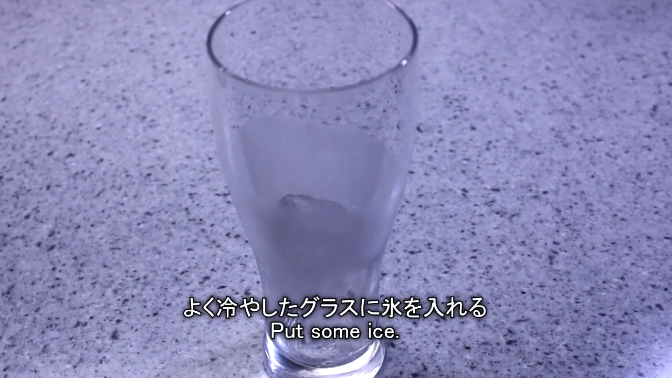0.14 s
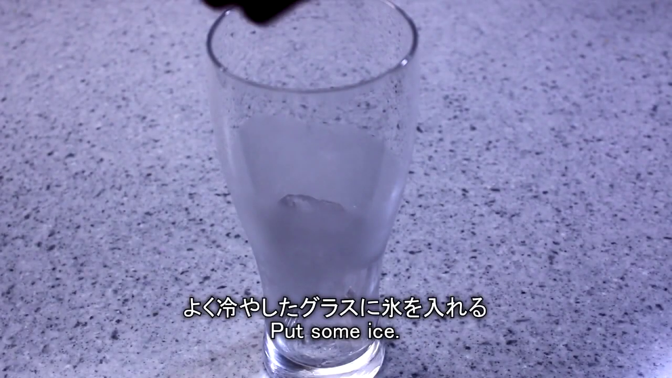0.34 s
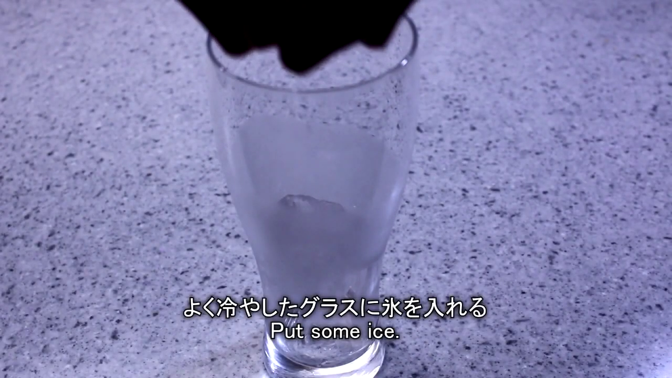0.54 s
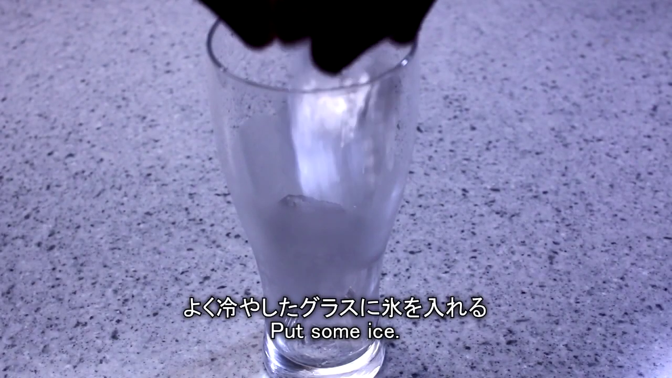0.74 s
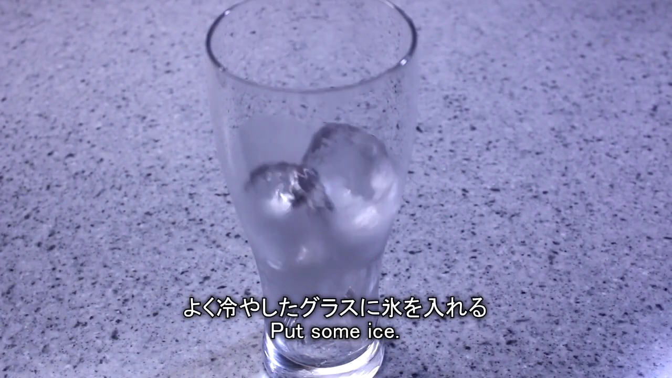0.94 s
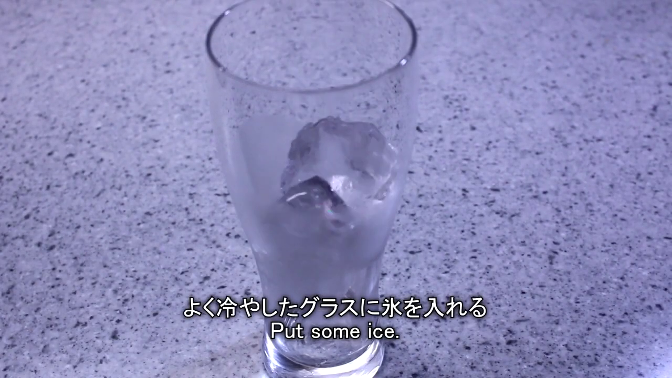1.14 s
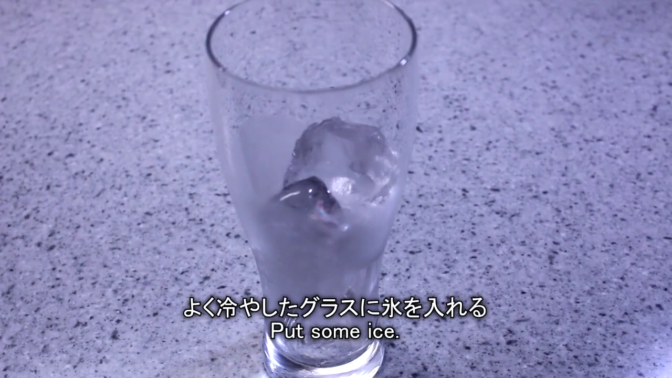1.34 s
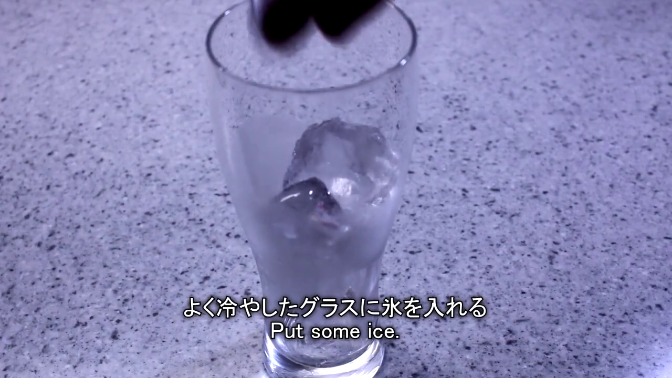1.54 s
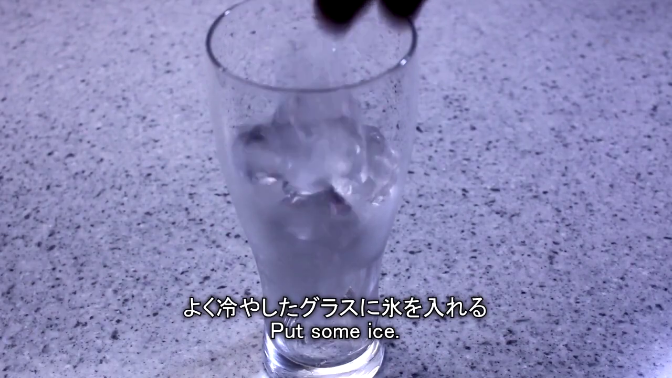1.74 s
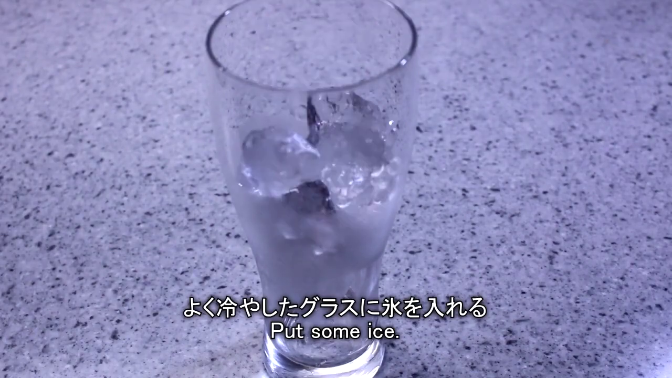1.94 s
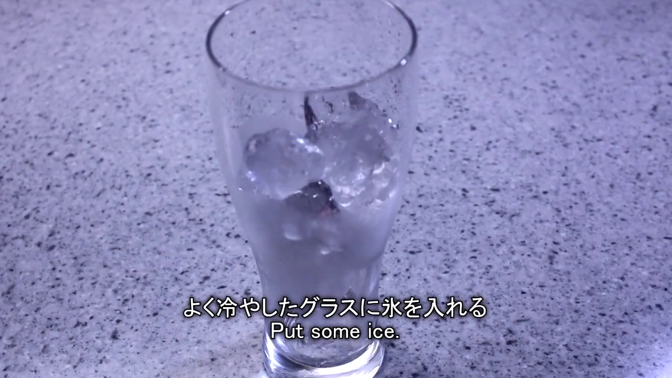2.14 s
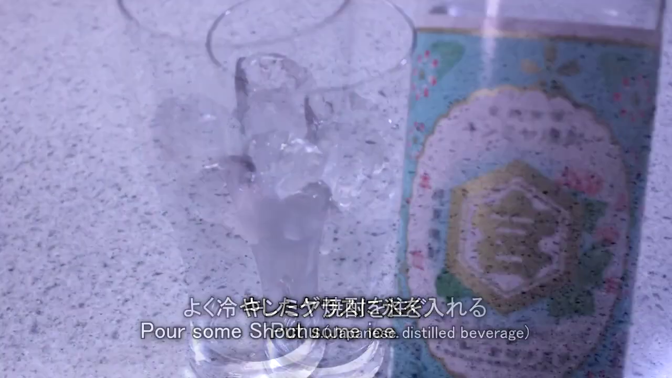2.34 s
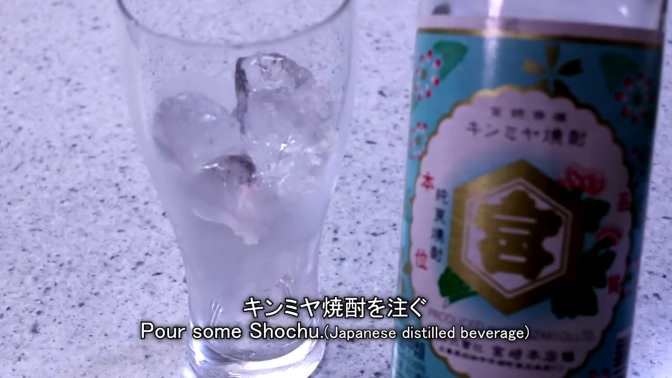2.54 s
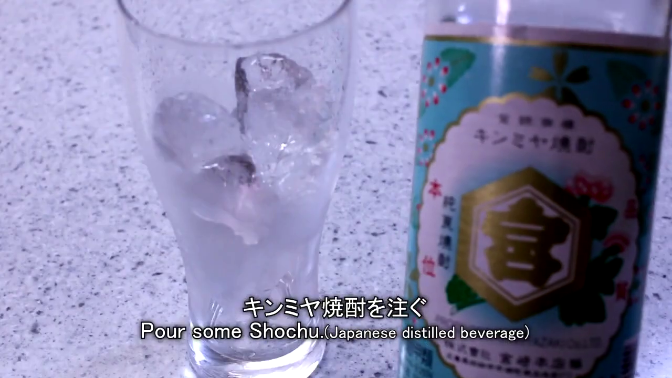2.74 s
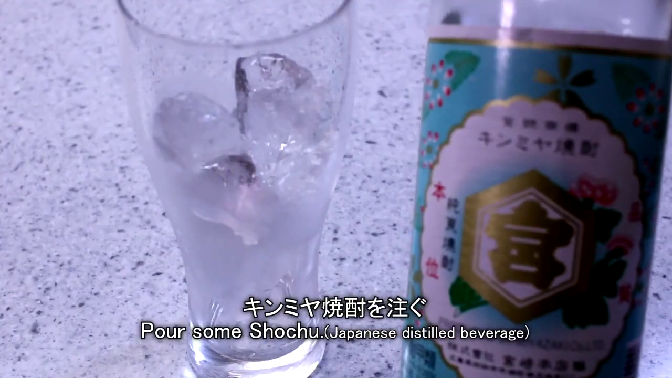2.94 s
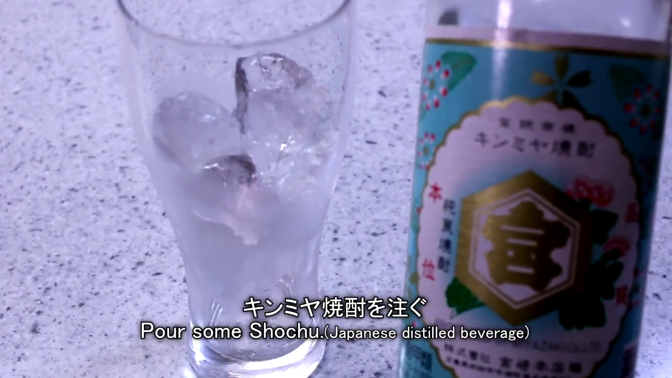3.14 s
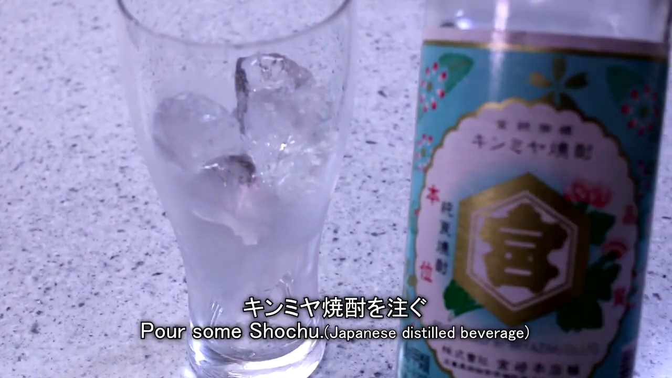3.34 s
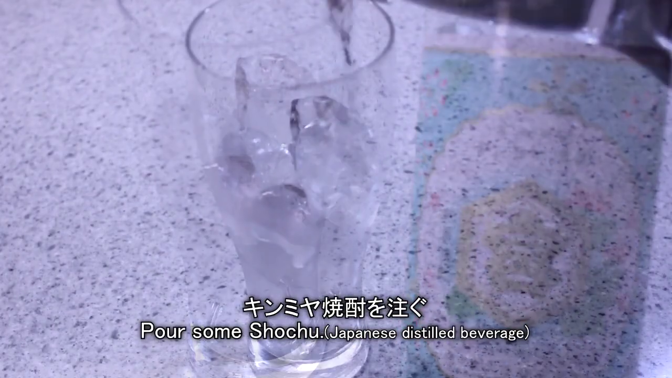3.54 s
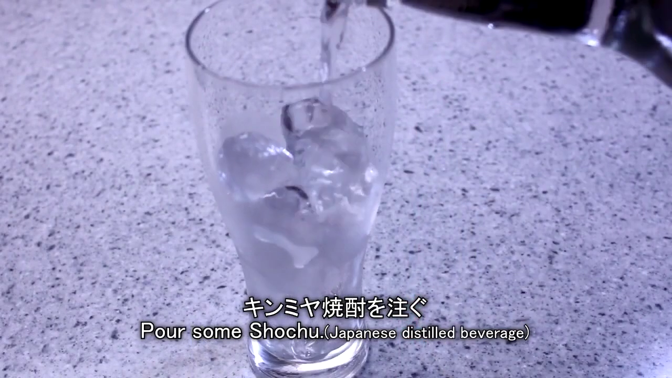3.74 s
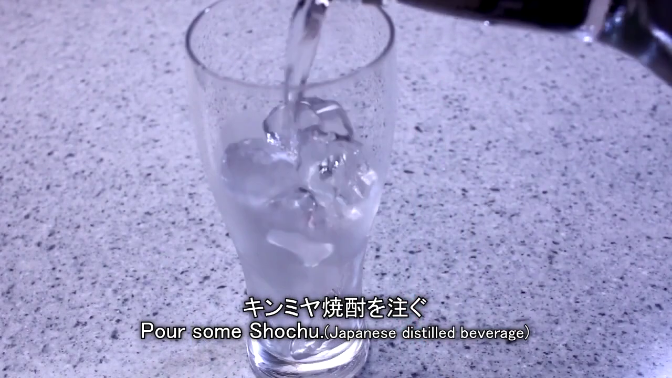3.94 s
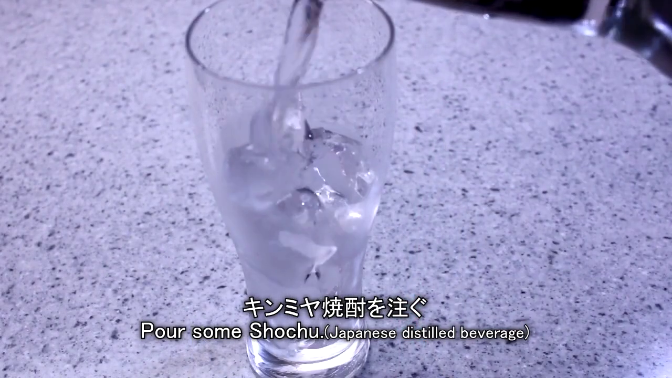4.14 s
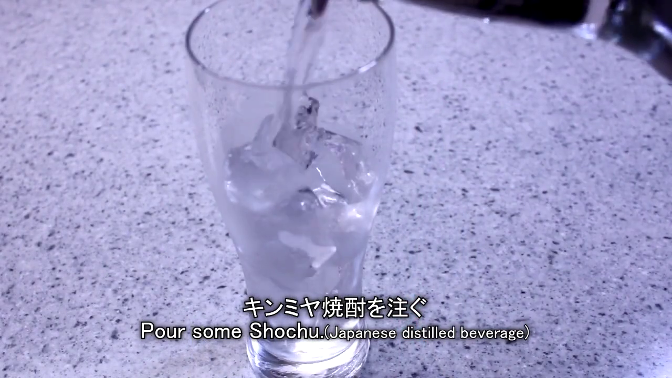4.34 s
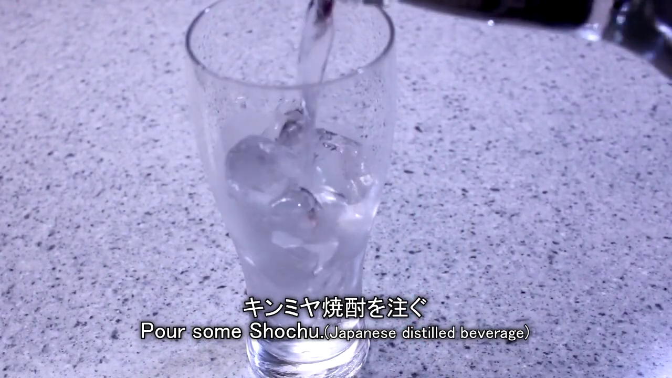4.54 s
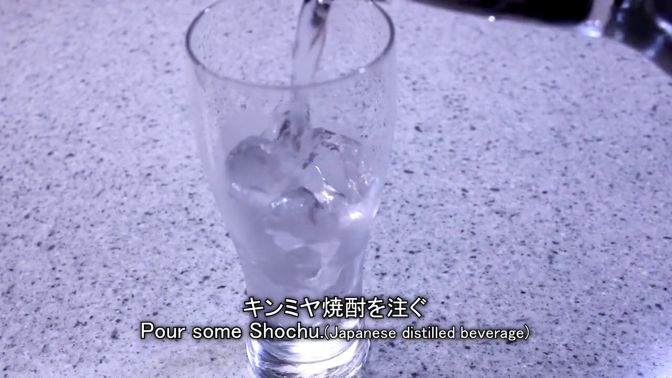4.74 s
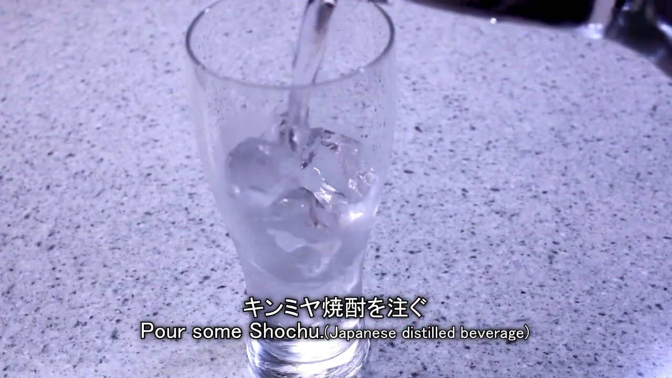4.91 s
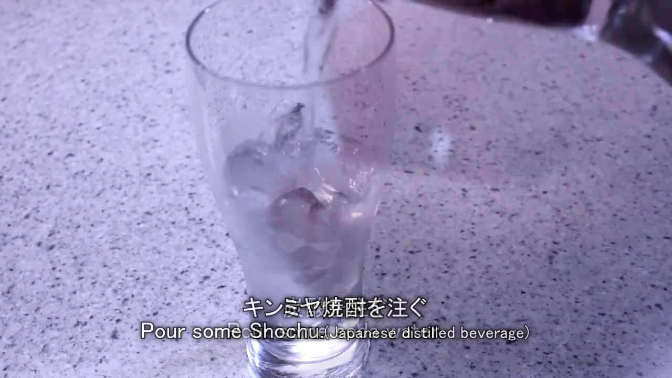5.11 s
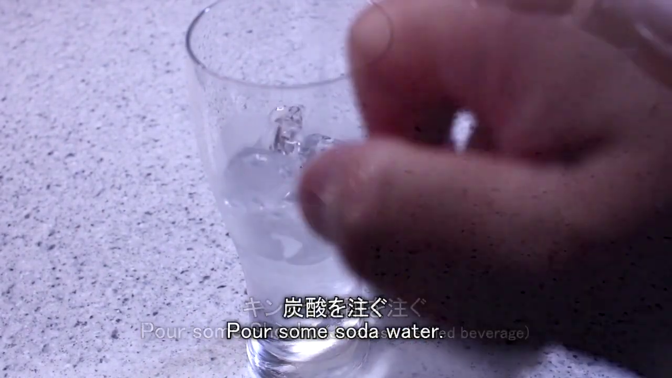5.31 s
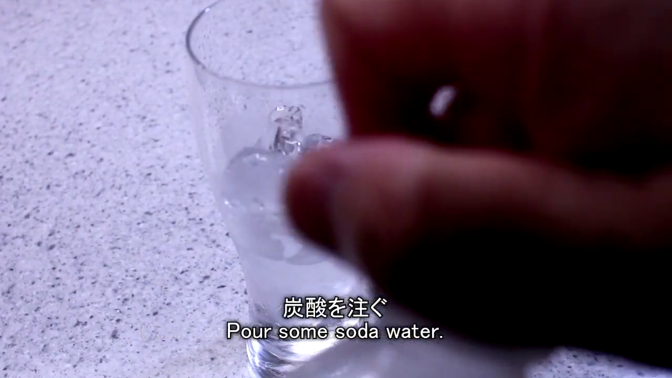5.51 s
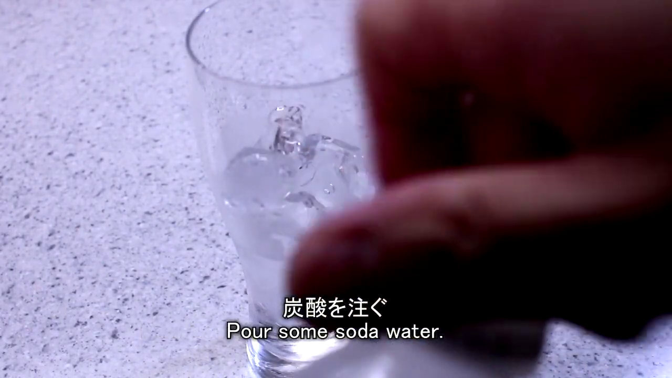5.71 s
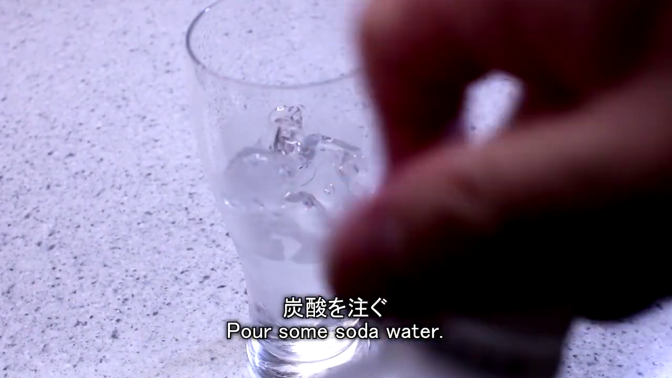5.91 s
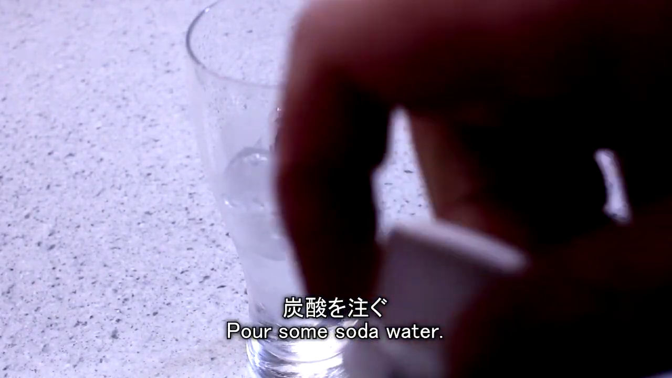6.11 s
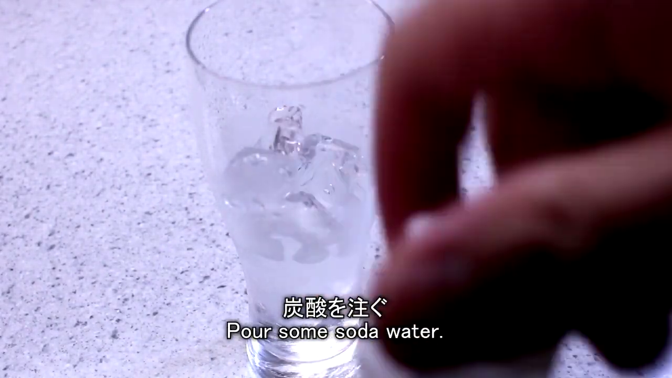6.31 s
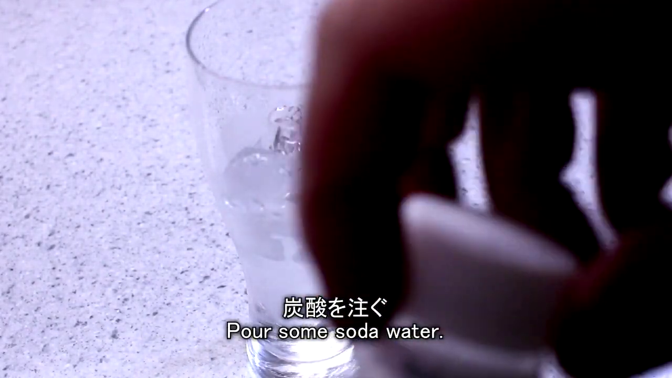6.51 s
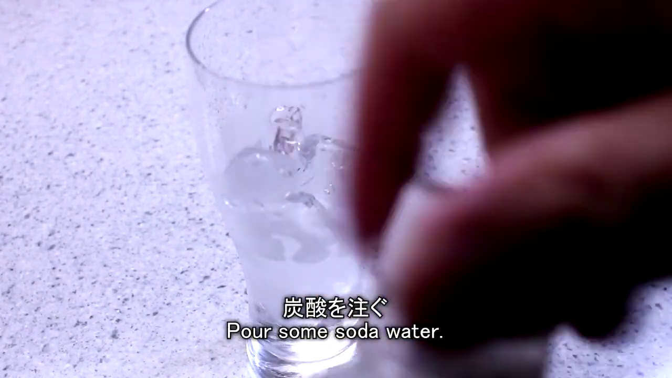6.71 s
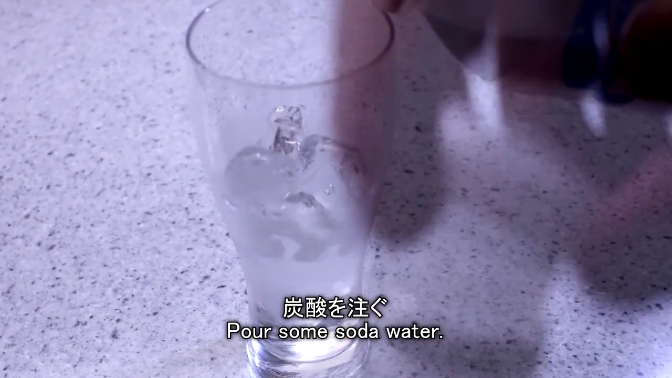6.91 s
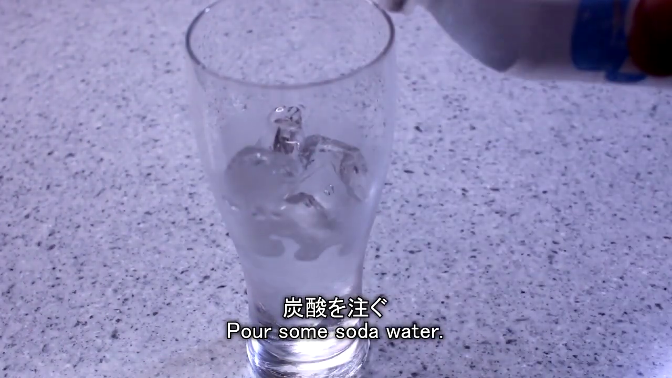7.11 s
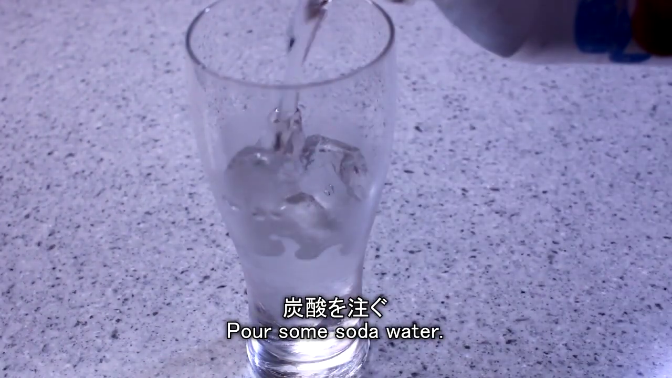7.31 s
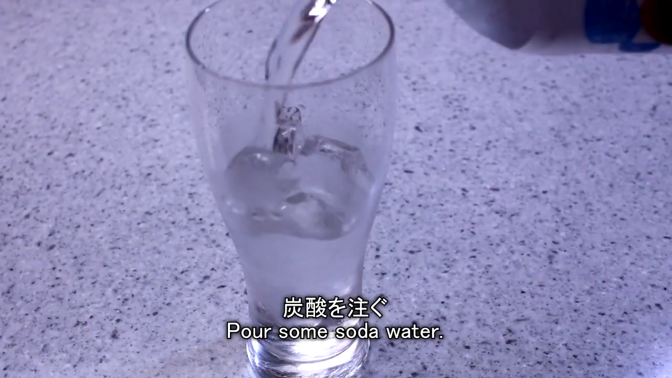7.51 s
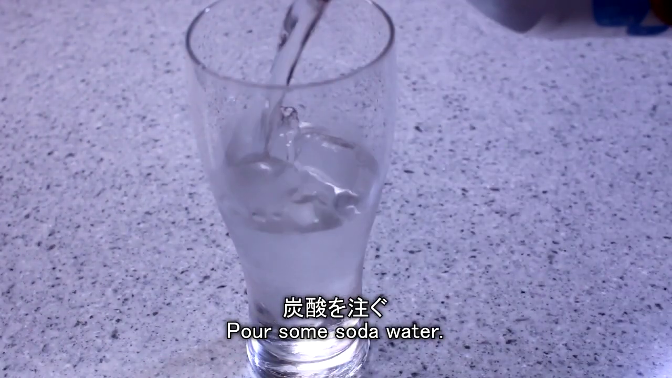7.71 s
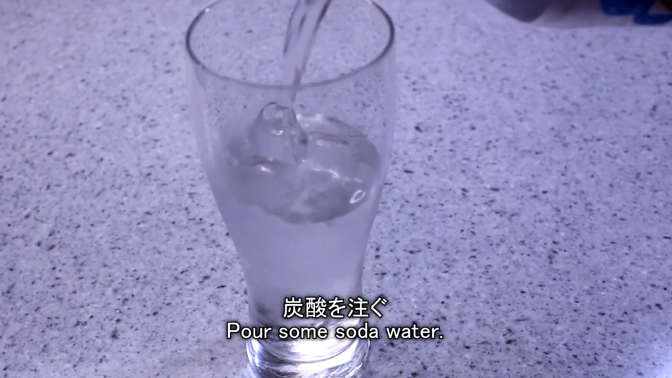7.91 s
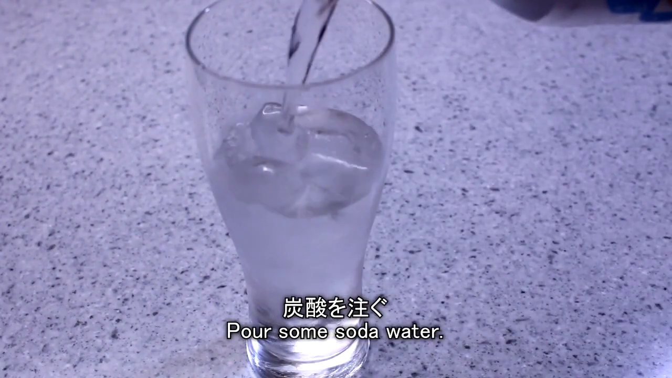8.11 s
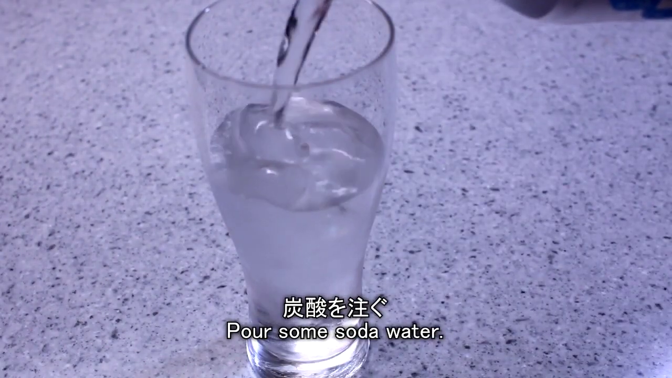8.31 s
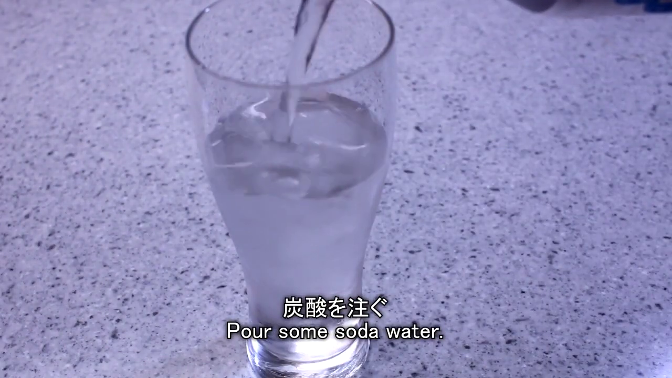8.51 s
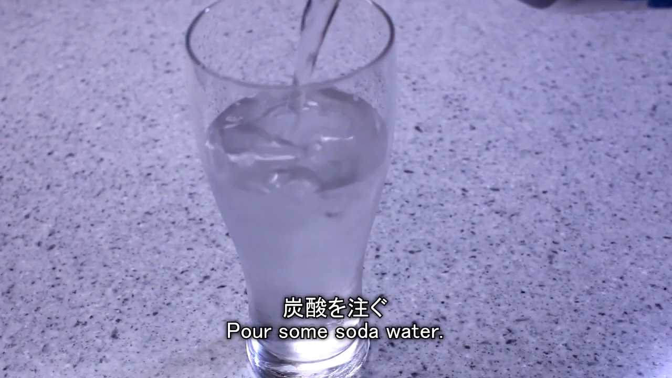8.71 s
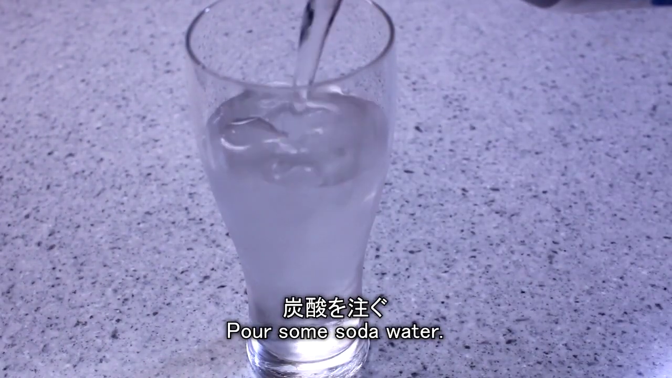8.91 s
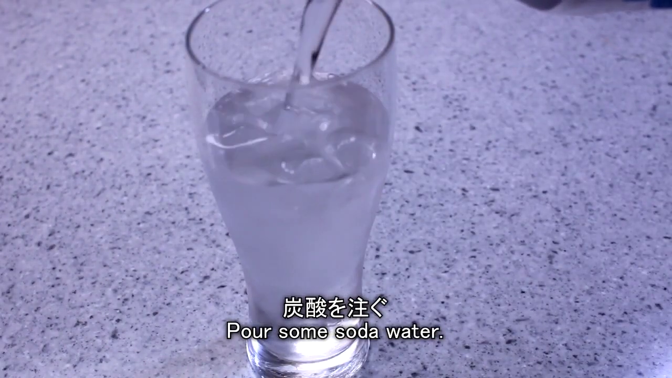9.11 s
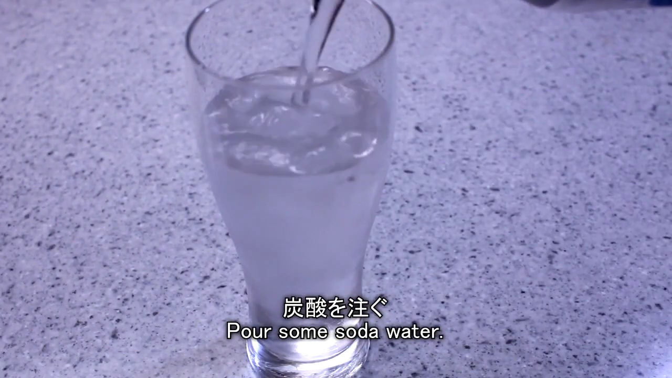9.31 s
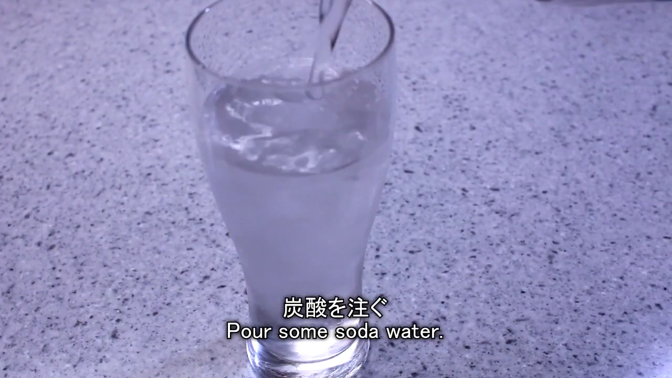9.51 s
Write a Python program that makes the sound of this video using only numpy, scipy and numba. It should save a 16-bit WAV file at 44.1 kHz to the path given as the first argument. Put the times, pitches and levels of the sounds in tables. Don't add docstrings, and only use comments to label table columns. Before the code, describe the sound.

A brief ice rattle, then hard cubes crack against glass and leave a beating ring. After a quiet gap with faint fan hum, a thin stream trickles and cubes shift and knock. A soda bottle is opened with a short burst of gas and dry plastic clicks, then soda gurgles upward to the brim. Closely miked, with slight small-room reverberation.

```python
import sys
import numpy as np
from scipy import signal
from scipy.fft import rfft, irfft, next_fast_len
from scipy.io import wavfile
from numba import njit

SR = 44100
rng = np.random.default_rng(int(sys.argv[2]) if len(sys.argv) > 2 else 0)


def attenuation_scalar(level_db):
    decades = np.asarray(level_db, float) / 20
    return 10 ** decades


def inscribe(sig):
    pcm = np.round(np.clip(np.atleast_2d(sig).T, -1, 1) * 32767)
    wavfile.write(sys.argv[1], SR, pcm.astype(np.int16))


N = 421155

# (frequency [Hz], level [dB], t60 [s])
WET_GLASS = [(345, -14.5, .12), (705, -6, 0.27), (1300, -1.5, 0.12), (2130, -24, 0.0025), (3056, 2, 0.18),
             (3780, 1, 0.054), (5450, -9, 0.12)]
# (frequency [Hz], level [dB], t60 [s])
FULL_GLASS = [(1050, -4, .07), (1280, -3, .07), (2050, -4, .05), (2800, -5, .08), (3300, 2, .06),
              (5450, -10, .04)]
# (time [s], peak [dB], ring [Hz])
FLOAT = [(7.316, -30.5, 5220), (7.378, -38, 2850), (7.405, -34.5, 2200), (7.543, -32.5, 2636),
         (7.689, -27.5, 1180), (7.833, -36, 2030), (7.9, -35, 5230), (8.0228, -32.5, 1028),
         (8.294, -24, 1140), (8.294, -24, 2100), (8.383, -21, 1290), (8.406, -16.5, 1100),
         (8.457, -20.5, 1300), (8.482, -26.5, 1040), (8.586, -32.5, 1214), (8.623, -37.5, 1000),
         (8.6582, -26, 1040), (8.66, -32.5, 1710), (8.677, -36, 1730), (8.718, -28, 1280),
         (8.753, -39.5, 1040), (8.778, -25, 1460), (8.808, -34, 1200), (8.837, -37.5, 1593),
         (8.854, -16.5, 1450), (8.858, -39, 3230), (8.874, -46, 1510), (8.884, -35, 1600),
         (8.916, -18.5, 1450), (8.968, -31, 1510), (8.978, -28.5, 1450), (9.004, -34.5, 1200),
         (9.014, -33.5, 1300), (9.048, -18, 1300), (9.057, -28, 1216), (9.08, -32.5, 1400),
         (9.102, -38.5, 1500), (9.144, -27.5, 1106), (9.169, -25.5, 1230), (9.213, -29, 1250),
         (9.23, -26, 1180), (9.281, -32.5, 1200), (9.3277, -26, 1067), (9.377, -24.5, 1100),
         (9.411, -33.5, 1032), (9.424, -33.5, 1100), (9.471, -38, 1525)]
CUBES_AFLOAT_S = 8.6
SETTLED_S, SODA_START_S = 4.567, 7.299


def rms_one(x):
    return x / np.sqrt(np.mean(x ** 2) + 1e-20)


def at_hz(points, hz):
    return np.interp(np.log(hz), np.log(np.array(points)[:, 0]), np.array(points)[:, 1])


def filtered(x, order, hz, kind):
    return signal.sosfilt(signal.butter(order, hz, kind, fs=SR, output="sos"), x)


def band(x, low_hz, high_hz):
    sos = signal.butter(2, [low_hz, min(high_hz, .45 * SR)], "band", fs=SR, output="sos")
    return signal.sosfilt(sos, x + 1e-18) * np.sqrt(SR / 2 / (high_hz - low_hz))


def colour(x, spectrum):
    gain = attenuation_scalar(at_hz(spectrum, np.linspace(1, SR / 2, 2049)))
    cepstrum = irfft(np.log(gain / np.sqrt(np.mean(gain ** 2))))
    cepstrum[1:2048] *= 2
    cepstrum[2049:] = 0
    response = irfft(np.exp(rfft(cepstrum)))
    return signal.oaconvolve(x, np.atleast_2d(response), axes=1)[:, :N]


def ring(clicks, hz, t60):
    r, w = attenuation_scalar(-60 / (t60 * SR)), 2 * np.pi * hz / SR
    return signal.lfilter([0, np.sin(w)], [1, -2 * r * np.cos(w), r * r], clicks + 1e-18)


def die_away(hits, t60):
    return signal.lfilter([1], [1, -attenuation_scalar(-60 / (t60 * SR))], hits)


@njit
def moving_resonance(x, hz, r, sr):
    y = np.zeros(len(x))
    for i in range(2, len(x)):
        turn = 2 * r * np.cos(2 * np.pi * hz[i] / sr)
        y[i] = x[i] - x[i - 2] + turn * y[i - 1] - r * r * y[i - 2]
    return y


def grains(per_s, spread_db):
    sizes = attenuation_scalar(spread_db * np.minimum(rng.exponential(1, N), 4)) * rng.choice([-1, 1], N)
    return rms_one(sizes * (rng.random(N) < per_s / SR))


def swells(s, peak_db, rise_db_s, fall_db_s):
    late = np.arange(N) / SR - np.reshape(s, (-1, 1))
    slope = np.where(late < 0, rise_db_s, -np.reshape(fall_db_s, (-1, 1)))
    return attenuation_scalar(np.maximum(np.reshape(peak_db, (-1, 1)) + slope * late, -200))


def knocks(rows, body, t60, ring_db, cycles, rise, wide_db, body_db, attack_s, linger_s=0.049, puff_db=-10.5):
    parts, rings = np.zeros((3, N + SR)), np.zeros(N + SR)
    t = np.arange(round(.15 * SR)) / SR
    noise = rng.standard_normal((len(rows), len(t)))
    stretch = np.array([[1.8], [1], [.6]])
    for (s, peak_db, hz, dull_db, bright_db), puff in zip(rows, noise):
        span = slice(round(s * SR), round(s * SR) + len(t))
        decays = attenuation_scalar(peak_db - 60 * t / stretch / t60) * (1 - np.exp(-t / attack_s))
        parts[:, span] += attenuation_scalar(np.array([[dull_db], [0], [bright_db]])) * decays
        phase = 2 * np.pi * hz * (t + rise * hz * t ** 2 / cycles)
        fade = attenuation_scalar(peak_db + ring_db - 60 * t / (cycles / hz + linger_s))
        tone = np.sin(phase) * fade * (1 - np.exp(-t * hz / 1.3))
        rings[span] += tone + attenuation_scalar(puff_db) * band(decays[1] * puff, hz / 1.296, hz * 1.31)
    dull, snap, bright = parts[:, :N] * rng.standard_normal((3, N)) * attenuation_scalar(-19.0)
    modes = np.zeros(N)
    for hz, level_db, ring_s in body:
        for detune in (.97, 1.03):
            modes += attenuation_scalar(level_db) * ring(snap, hz * detune, min(ring_s, .012 + 25 / hz))
    modes = filtered(modes, 2, 150, "high")
    snaps = band(dull, 120, 630) + attenuation_scalar(wide_db) * band(snap, 1000, 2400) + band(bright, 5700, 11000)
    return snaps + attenuation_scalar(body_db) * modes + rings[:N]


def grinding(strokes, body, per_s, rise_db_s):
    s, db, fade = np.transpose(strokes)
    slips = grains(per_s, spread_db=6.5)
    driven = swells(s, db, rise_db_s, fade).sum(axis=0) * slips
    out = np.zeros(N)
    for k, (hz, level_db, t60) in enumerate(body):
        out += attenuation_scalar(level_db) * np.sqrt(28 / (t60 * SR)) * ring(np.roll(driven, k % 3), hz, t60)
    return out


def widen(x, side_db, lag_s):
    echo = np.roll(filtered(x, 2, 7000, "low"), round(lag_s * SR))
    return x + attenuation_scalar(side_db) * echo * [[1], [-1]]


def air():
    # (frequency [Hz], density [dB per Hz])
    air_tone = [(15, -33.5), (25, 0), (64, 8), (141, -8.5), (223, 1.5), (277, -10.5), (317, -4.5),
                (516, -12), (607, -13.5), (1020, -17), (2990, -28.5), (10100, -36.5), (16000, -43)]
    # (frequency [Hz], likeness [0-1])
    likeness = [(60, 0.18), (240, 1), (950, 0.076), (3770, 0.04), (15000, 0.03)]
    # (level [dB], rise in the louder stretches [dB])
    air_parts = [
        (-77.5, 12.5),
        (-57, 4.5),
        (-56, 2),
    ]
    # (start [s], end [s])
    louder_spans = [
        (2.2, 3.69),
        (6.7, 12),
    ]
    ramp_s = 0.21
    mid, side = rfft(rng.standard_normal((2, N)))
    hz = np.linspace(1, SR / 2, len(mid))
    alike = np.clip(at_hz(likeness, hz), 0, 1)
    both = np.sqrt(1 + alike) * mid + np.sqrt(1 - alike) * side * [[1], [-1]]
    both = both * attenuation_scalar(at_hz(air_tone, hz))
    low, high = 1 / (1 + (hz / 110) ** 4), 1 / (1 + (1000 / hz) ** 2)
    shares = [low, 1 - low - high, high]
    t = np.arange(N) / SR
    lift = sum(np.clip(np.minimum(t - on, off - t) / ramp_s, 0, 1) for on, off in louder_spans)
    out = np.zeros((2, N))
    for (db, rise_db), share in zip(air_parts, shares):
        out += attenuation_scalar(db + rise_db * lift) * rms_one(irfft(both * share, N))
    return out


def ice_tray():
    # (time [s], peak [dB], ring [Hz])
    grab = [
        (0.028, -24.5, 4100),
        (0.029, -22, 2250),
        (0.039, -21, 1450),
        (0.056, -24, 2300),
        (0.076, -28, 4460),
        (0.094, -19.5, 4120),
        (0.13, -24, 6800),
        (0.15, -14, 4100),
        (0.188, -22.5, 3860),
    ]
    # (frequency [Hz], level [dB], t60 [s])
    tray = [(1100, -27, 0.09), (1450, -29, 0.013), (2500, 6.5, 0.035), (3900, 5.5, 0.047),
            (4570, -30, 0.038), (7000, -4, 0.032)]
    # (time [s], level [dB], fade [dB per s])
    rattle = [
        (.04, -36, 158),
        (.07, -61, 219),
        (.1, -51, 152),
        (.155, -48.5, 201.5),
        (.19, -55, 149),
    ]
    # (frequency [Hz], level [dB], t60 [s])
    rattle_body = [(1080, -8, .02), (1480, -5, .02), (2250, 2, .025), (2500, -4, .015), (4100, -4, .015),
                   (4550, -5, .012), (5000, -12, .01), (7300, -7, .008)]
    rows = [(*row, -24, -30) for row in grab]
    out = knocks(rows, tray, t60=0.061, ring_db=4, cycles=18.0, rise=.01, wide_db=-21, body_db=-18,
                 attack_s=.0004, linger_s=0.0091, puff_db=-14.0)
    out += grinding(rattle, rattle_body, per_s=5000, rise_db_s=2500)
    out = filtered(out, 4, 750, "high")
    return np.array([out, np.roll(out, 9)])


def rubbing():
    # (time [s], level [dB], bright grains [dB], fade [dB per s])
    rub = [
        (0.042, -37, -21.5, 94),
        (5.6, -52, 0.5, 287.5),
        (5.745, -39.5, 0, 900),
        (5.809, -48, 0.5, 694),
        (6.38, -50, 5, 95),
        (6.45, -42, -33, 348.5),
        (6.6, -68, 10.5, 41),
        (6.819, -43, -3.5, 401.5),
        (6.939, -64, 7, 394),
    ]
    s, db, bright_db, fade = np.transpose(rub)
    strokes = swells(s, db, 901, fade)
    clicks = grains(4900, spread_db=1.5)
    dull = band(strokes.sum(axis=0) * clicks, 700, 4400)
    return dull + band(attenuation_scalar(bright_db) @ strokes * clicks, 3200, 12000)


def drops():
    # (time [s], peak [dB], wall modes [dB], chatter [dB])
    landings = [(0.734, -10, -16, -19.5), (.778, -19, -5, -14), (.785, -5.5, -9.5, -24),
                (0.8141, -15, -15.5, -16), (0.846, -22.5, -2.5, -6), (1.032, -42, -11, -8),
                (1.101, -39.5, -37, -35), (1.444, -47, -8.5, -20), (1.7078, -23.5, -5, -10),
                (1.7335, -8, -8.5, -24.5), (1.746, -18.5, -6, -20.5), (1.865, -16, -16, -19),
                (1.953, -22.5, -35.5, -18.5), (1.969, -20, -18, -30), (2.429, -43, -43.5, -33.5)]
    # (frequency [Hz], density [dB per Hz])
    crack_tone = [(59, -38), (100, -19), (1230, 3), (2470, -8), (3320, -2), (4870, -11), (5530, 0),
                  (10000, -21.5), (12400, -8.5), (16000, -30)]
    wall_hz = [3200, 3380, 4030, 4640, 5470, 5620, 6220, 7430, 7960, 9100, 10740, 12120, 13260, 15400]
    # (level [dB], t60 [s])
    wall = [(-11, 0.1), (-16.5, 0.056), (-18, 0.066), (-16, 0.093), (-20, 0.12), (2.5, 0.034),
            (-1.5, 0.023), (-7.5, 0.14), (-13.5, 0.12), (-12, 0.11), (-14, 0.052), (-16.5, 0.21),
            (-27, 0.09), (-23.5, 0.09)]
    # (frequency [Hz], level [dB], t60 [s])
    base = [(163.9, -14, 0.052), (223, -13.5, 0.069), (320, -10, .07), (344, -10, 0.07), (383.5, -5, 0.06),
            (640, -3, 0.05), (720, -2, 0.06), (1202, -12, 0.04)]
    size = N // 3
    s, peak_db, wall_db, chatter_db = np.transpose(landings)
    base_db = -13 - .15 * (peak_db + 10.0)
    at = np.round(s * SR).astype(int)
    hits, rolls = np.zeros((2, 2, size))
    hits[:, at] = attenuation_scalar(peak_db + np.array([[.5], [-.5]]))
    rolls[:, at] = hits[:, at] * attenuation_scalar(chatter_db)
    mid, other = rng.standard_normal((2, size))
    noise = mid + .4 * other * [[1], [-1]]
    crack = die_away(hits, 0.026) * noise
    chatter = die_away(rolls, .3) * noise
    hard_hits = hits * attenuation_scalar(-.4 * np.abs(20 * np.log10(hits + 1e-9) + 5.5))
    keen = die_away(hard_hits, 0.012) * noise
    crack = filtered(crack, 4, 8800, "low") + attenuation_scalar(3.5) * filtered(keen, 4, 8800, "high")
    out = colour(attenuation_scalar(3.0) * crack + filtered(chatter, 4, 8800, "low"), crack_tone)[:, :size]
    split = rng.uniform(.006, .024, (len(wall), 2)) * [-1, 1]
    split = split * np.minimum(1, 8000 / np.array(wall_hz)[:, None])
    modes = []
    for hz, mode, pair in zip(wall_hz, wall, split):
        modes += [(hz * (1 + d), *mode, wall_db) for d in (0, *pair)]
    modes += [(*mode, base_db) for mode in base]
    chance = rng.standard_normal((len(at), 110))
    for k, (hz, level_db, t60, share_db) in enumerate(modes):
        sides_db = np.outer([1, -1], 1.53 * chance[:, k + 55])
        clicks = attenuation_scalar(-22.5) * chatter
        clicks[:, at] += hits[:, at] * attenuation_scalar(share_db + 2.4 * chance[:, k] + sides_db)
        out += attenuation_scalar(level_db) * ring(clicks, hz, t60)
    return np.pad(filtered(out, 2, 110, "high"), ((0, 0), (0, N - size)))


def wall_pair(rows, hz, beat_hz, t60, spread):
    t, (s, level_db, balance) = np.arange(N) / SR, np.transpose(rows)
    row = np.maximum(np.searchsorted(s, t) - 1, 0)
    age = t - s[row]
    beat = 1 + balance[row] * np.exp(2j * np.pi * beat_hz * age)
    pair = (age > 0) * attenuation_scalar(level_db[row] - 60 * age / t60) * beat
    r = np.exp(-1 / (.003 * SR))
    phase = 2 * np.pi * hz * t + np.array([[-spread], [spread]])
    return np.imag(signal.lfilter([1 - r], [1, -r], pair) * np.exp(1j * phase))


def long_modes():
    # (time [s], level [dB], pair balance [-1 to 1])
    rim_hits = [
        (.738, -14, .1),
        (.776, -34, .1),
        (.814, -11, .1),
        (.85, -23, .35),
        (1.708, -34, .5),
        (1.75, -21, -.85),
        (1.887, -55, .1),
        (1.905, -28, .2),
        (1.96, -35, -.1),
    ]
    # (time [s], level [dB], pair balance [-1 to 1])
    second_hits = [
        (.733, -23, .3),
        (.778, -32, .1),
        (.812, -11.5, -.97),
        (1.036, -39, .1),
        (1.185, -75, .1),
        (1.733, -36, .6),
        (1.8, -31, .1),
        (1.9, -31, -.3),
    ]
    lean = .6
    rim = wall_pair(rim_hits, 1439, beat_hz=4.0, t60=.46, spread=-lean)
    second = wall_pair(second_hits, 2947, beat_hz=4.7, t60=.47, spread=lean)
    return attenuation_scalar(np.array([[2.5], [4.5]])) * rim + attenuation_scalar(4.5) * second


def clacks():
    # (time [s], peak [dB], ring [Hz])
    contacts = [(0.735, -17, 4300), (0.785, -3, 6040), (.786, -12, 1230), (.814, -12.5, 2160),
                (0.817, -17, 7500), (.846, -14.5, 5530), (1.7335, -8, 6125), (1.734, -8, 7750),
                (1.733, -9, 3400), (1.736, -12, 800), (1.747, 1, 5630), (1.866, -10.5, 5500),
                (1.97, -15, 3750)]
    # (time [s], level [dB], ring [Hz])
    favoured = [
        (.786, -37.5, 11330),
        (.815, -28, 11650),
        (.815, -41, 13300),
        (1.709, -37, 5545),
        (1.745, -26, 5430),
        (1.747, -35.5, 10740),
        (1.864, -29.5, 5810),
    ]
    short = [(*row, -30, -30) for row in contacts]
    pings = [(*row, -30, -30) for row in favoured]
    out = knocks(short, [], t60=0.043, ring_db=-2, cycles=26.5, rise=0, wide_db=-27.5, body_db=-60,
                 attack_s=0.00045, linger_s=0.034)
    return out + knocks(pings, [], t60=.03, ring_db=9, cycles=30.0, rise=0, wide_db=-30.5, body_db=-60,
                        attack_s=.0005, linger_s=.13)


def grinding_cubes():
    # (time [s], level [dB], fade [dB per s])
    slides = [(.99, -40.5, 105.5), (1.1, -48.5, 297.5), (3.765, -36.5, 250), (3.79, -53, 350),
              (3.86, -39, 202), (3.9, -52, 304), (3.94, -60, 357), (4.09, -40, 203), (4.14, -36.5, 350),
              (4.18, -62, 500), (4.36, -48, 400), (4.465, -42, 300), (4.535, -50, 203), (4.57, -56, 700),
              (4.8, -62, 83), (5.0, -64, 123), (5.27, -55.5, 122)]
    # (frequency [Hz], level [dB], t60 [s])
    slide_body = [(165, -7, .07), (320, 0, .07), (400, -4, .05), (630, -3, .06), (800, -10, .04),
                  (1250, -8, .025), (1480, -12, .03), (2050, -14, .02), (2980, -13, .025),
                  (3800, -20, .015)]
    return grinding(slides, slide_body, per_s=380, rise_db_s=1205)


def settling():
    # (time [s], peak [dB], ring [Hz])
    settle = [
        (2.368, -46, 4400),
        (2.4324, -36, 4000),
        (2.4514, -41, 1770),
        (3.3864, -42, 5560),
        (3.4694, -48, 1580),
    ]
    # (time [s], peak [dB], ring [Hz])
    trickle = [(4.593, -37, 2400), (4.614, -29.5, 3950), (4.641, -31, 4500), (4.685, -34.5, 610),
               (4.72, -36.5, 1420), (4.772, -44, 885), (4.789, -35.5, 5300), (4.797, -38, 880),
               (4.813, -38, 910), (4.854, -37, 1560), (4.866, -30.5, 3850), (4.875, -41, 1120),
               (4.901, -31.5, 1563), (4.97, -44, 4200), (4.99, -24.5, 4520), (5.005, -36.5, 1520),
               (5.026, -29, 5500), (5.046, -34, 5860), (5.093, -30.5, 642), (5.115, -37, 620),
               (5.149, -35.5, 1650), (5.163, -37.5, 880), (5.176, -33.5, 2590), (5.225, -36.5, 1560),
               (5.26, -37.5, 2340), (5.283, -41, 3880), (5.323, -31, 2800), (5.338, -32, 3700)]
    rows = [(*row, -25, 6) for row in list(trickle) + list(settle)]
    return knocks(rows, WET_GLASS, t60=0.034, ring_db=0.0, cycles=14.0, rise=.008, wide_db=8, body_db=-16,
                  attack_s=0.0012, linger_s=0.015, puff_db=-9.5)


def flow(column_hz):
    # (start [s], end [s], start level [dB], swell [dB per s], fine bubbles [dB])
    streams_table = [
        (3.332, 5.333, -65, 6, 3.5),
        (7.33, 9.415, -60.5, 7.5, 5.5),
    ]
    # (time [s], level [dB], fine bubbles [dB])
    breaks = [
        (3.84, -73, -20),
        (3.92, -63.5, 14),
        (4.115, -43.5, 11.5),
        (4.38, -38.5, -4.5),
        (4.508, -42.5, 0.5),
        (4.85, -63.5, 12.5),
        (7.8, -42, -15.5),
        (8.416, -32, -15.5),
    ]
    t = np.arange(N) / SR
    start, end, db, swell, fine_db = np.transpose(streams_table)[:, :, None]
    outside = np.maximum(0, np.maximum(start - t, t - end))
    streams = attenuation_scalar(np.maximum(db + swell * (t - start) - 155 * outside, -200))
    s, splash_db, spray_db = np.transpose(breaks)
    splashes = swells(s, splash_db, 320, 147)
    fading = attenuation_scalar(-0.27 * np.maximum(0, column_hz - 993))
    coarse = streams.sum(axis=0) + splashes.sum(axis=0)
    fine = fading * (attenuation_scalar(fine_db) * streams).sum(axis=0) + attenuation_scalar(spray_db) @ splashes
    return coarse, fine


def pouring():
    # (time [s], pitch [Hz])
    column_pitch = [
        (3.3, 640),
        (4.2, 600),
        (4.6, 927),
        (5.401, 984),
        (7.2, 981),
        (8.3, 1070),
        (9.55, 1250),
    ]
    hz = np.interp(np.arange(N) / SR, *np.transpose(column_pitch))
    coarse, fine = flow(hz)
    clumps = attenuation_scalar(4.6 * band(rng.standard_normal(N), 6.4, 16.8))
    clicks, dealt = grains(1700, spread_db=3.2), rng.integers(0, 28, N)
    rings = []
    for k, pitch in enumerate(np.geomspace(880, 7500, 28)):
        births = clicks * (dealt == k) * np.roll(clumps, k // 5 * SR // 3)
        bubble = ring(births, pitch, .014 + 30 / pitch)
        rings.append(ring(bubble, pitch, .004 + 10 / pitch) * pitch ** .5)
    big, small = rms_one(sum(rings[:11])), rms_one(sum(rings[11:]))
    drive = band(clicks * clumps + 0.31 * rng.standard_normal(N), 240, 3300)
    column = rms_one(moving_resonance(drive, hz, np.exp(-np.pi * 90 / SR), SR))
    third = rms_one(moving_resonance(drive, 3.84 * hz, np.exp(-np.pi * 160 / SR), SR))
    droplets = grains(1100, spread_db=3.5) * clumps[::-1]
    sizes_hz = np.geomspace(4400, 12000, 5)
    spray = rms_one(sum(band(np.roll(droplets, round(low)), low, 1.3 * low) for low in sizes_hz))
    low_part = attenuation_scalar(-4.5) * big + attenuation_scalar(-8.5) * column
    return coarse * low_part + fine * (attenuation_scalar(-4.5) * small + attenuation_scalar(-12.0) * third + attenuation_scalar(-5.5) * spray)


def shifting():
    # (time [s], peak [dB], ring [Hz], dull part [dB], bright part [dB])
    shifts = [(3.572, -36, 1610, -18, -24), (3.635, -24, 2840, -28, 4), (3.648, -27, 2300, -20, 0),
              (3.736, -32, 2800, 9, -31), (3.75, -18, 1990, 4, -9), (3.768, -28, 2950, -9, 6),
              (3.783, -29, 1250, -9, -19), (3.825, -43, 2030, -9, -19), (3.851, -31, 640, -11, -19),
              (3.866, -28, 2000, -12, -15), (3.888, -23.5, 4750, -11, -25), (3.899, -27, 1250, -17, -24),
              (3.913, -22.5, 1300, 2, -21), (3.937, -30, 1530, -15, -11), (3.989, -31.5, 5600, -9, 10.5),
              (4.013, -29, 1950, -25, -28.5), (4.053, -31, 2000, -22, -17), (4.065, -30, 1270, -26, -17),
              (4.079, -21, 1900, -20, -12), (4.093, -27, 2900, -23, -7), (4.105, -16.5, 1300, -25, -13),
              (4.118, -9, 2940, -29, 18), (4.121, -18.5, 1280, -28, -20), (4.175, -33, 5140, -20, 20),
              (4.253, -41, 2640, -20, -10), (4.268, -32, 1130, -23.5, -37.5),
              (4.288, -31.5, 1380, -20, -22), (4.317, -13, 3770, -5.5, -0.5), (4.448, -21.5, 1990, -6, 10),
              (4.465, -21, 2200, -20, -20), (4.488, -16.5, 1400, -27, -37), (4.509, -12.5, 791, 0, -7),
              (4.53, -29, 2980, -20, -15), (4.567, -40, 830, -10, -20)]
    return knocks(shifts, WET_GLASS, t60=0.045, ring_db=-2.5, cycles=16.6, rise=0.019, wide_db=9.5,
                  body_db=-16.5, attack_s=0.00064, linger_s=0.02)


def soaked_wall(ice, liquid):
    # (frequency [Hz], level [dB])
    soaked_modes = [(1510, -32), (2950, -39), (3800, -39), (5520, -41)]
    t = np.arange(N)
    soaked = np.clip((t / SR - SETTLED_S) * 10, 0, 1) * (t < SODA_START_S * SR)
    spirit = soaked * (ice + attenuation_scalar(1.0) * liquid)
    return sum(attenuation_scalar(level_db) * ring(spirit, hz, .045) for hz, level_db in soaked_modes)


def cap_clicks():
    # (time [s], peak [dB], ring [Hz], bright part [dB])
    clicks = [(5.707, -27, 2090, 9.5), (6.142, -5, 3300, -6), (6.179, -10, 3400, -3),
              (6.188, -29, 3360, -23), (6.345, -18, 3700, 4), (6.379, -20, 1900, 14),
              (6.387, -21, 3250, -16), (6.436, -32, 3430, 6), (6.448, -27.5, 3450, 1),
              (6.458, -28.5, 3300, 8), (6.531, -39.5, 3260, -3), (6.543, -42.5, 3280, 1),
              (6.566, -29.5, 3300, -19), (6.588, -7.5, 3760, 1.5), (6.596, -12, 3100, -7.5),
              (6.748, -21, 3600, 6), (6.758, -16, 3500, 4), (6.768, -28.5, 3370, 13),
              (6.781, -19.5, 3100, -34), (6.833, -26.5, 1350, 7), (6.876, -14.5, 3100, 6.5),
              (6.934, -25, 2900, -1.5)]
    # (frequency [Hz], level [dB], t60 [s])
    plastic = [(773, -1, 0.042), (1900, -3, 0.039), (3100, 3, 0.05), (3700, 4.5, 0.03)]
    rows = [(s, db, hz, -11 - 0.74 * (db + 12.0), bright_db) for s, db, hz, bright_db in clicks]
    return knocks(rows, plastic, t60=0.032, ring_db=-10.5, cycles=28.0, rise=0.013, wide_db=-3.0, body_db=-26,
                  attack_s=0.00027, linger_s=0.0092)


def jet():
    # (time [s], level [dB])
    gas_flow = [
        (5.915, -58.5),
        (5.931, -19.5),
        (5.945, -7.5),
        (5.99, -4.5),
        (6.043, -10),
        (6.062, -28),
        (6.15, -25.5),
        (6.2, -34.5),
        (6.34, -54),
    ]
    # (frequency [Hz], density [dB per Hz])
    gas_tone = [(120, -54), (200, -27.5), (950, -32.5), (1060, -19), (1480, -36.5), (1560, -16),
                (2700, -23.5), (3760, -15.5), (7970, 3.5), (16000, -4.5)]
    s, db = np.transpose(gas_flow)
    hiss_db = np.interp(np.arange(N) / SR, s, db, -130, -130)
    whistle = swells(5.945, -9.5, 1601, 479.5)[0] + swells(5.931, -25.5, 3000, 893)[0]
    throat = whistle + attenuation_scalar(np.minimum(hiss_db - 15.5, -44))
    flutter = attenuation_scalar(1.7 * band(rng.standard_normal(N), 40, 846.7))
    noise = rng.standard_normal((2, N)) * flutter
    hiss = attenuation_scalar(hiss_db) * colour(noise[:1], gas_tone)[0]
    return hiss + attenuation_scalar(-5.5) * throat * band(noise[1], 2500, 3900)


def wet_wall(x):
    # (time [s], pitch [Hz])
    climb = [
        (7.299, 2730),
        (8.001, 3050),
        (8.28, 3197),
    ]
    t, r = np.arange(N) / SR, np.exp(-np.pi * 49 / SR)
    level_db = 6.5 - 12 * np.maximum(0, t - CUBES_AFLOAT_S)
    return attenuation_scalar(level_db) * (1 - r * r) / 2 * moving_resonance(x, np.interp(t, *np.transpose(climb)), r, SR)


def floating_cubes():
    rows = [(s, db, hz, -24, -25 - .82 * (db + 31.5)) for s, db, hz in FLOAT if s < CUBES_AFLOAT_S]
    return knocks(rows, FULL_GLASS, t60=.04, ring_db=-5, cycles=22.0, rise=.03, wide_db=-14, body_db=-17,
                  attack_s=.001)


def plops():
    rows = [(*row, -24, -23.5) for row in FLOAT if row[0] >= CUBES_AFLOAT_S]
    return knocks(rows, FULL_GLASS, t60=0.047, ring_db=6.0, cycles=6.7, rise=.04, wide_db=-32.5, body_db=-34.5,
                  attack_s=0.000078, linger_s=0.0037)


def room(x):
    room_t60_s, cut_hz = 0.41, 3500
    size = next_fast_len(N + SR)
    w = np.linspace(0, np.pi, size // 2 + 1)
    t60 = room_t60_s / (1 + (w * SR / 2 / np.pi / cut_hz) ** 2) ** .5
    sums = np.zeros((2, len(w)), complex)
    for k, lag in enumerate((rng.uniform(.008, .035, 16) * SR).astype(int)):
        loop = attenuation_scalar(-60 * lag / SR / t60) * np.exp(-1j * w * lag)
        sums[k % 2] += loop / (1 - loop) * (-1) ** (k // 2)
    return irfft(rfft(x, size) * sums * (t60 / room_t60_s), size)[:, :N]


def scene():
    tray = ice_tray() * attenuation_scalar(np.array([[2.5], [-2.5]]))
    dry_glass = drops() + widen(clacks(), side_db=-7, lag_s=.0013)
    liquid = pouring()
    ice = shifting() + settling() + grinding_cubes()
    ice = ice + soaked_wall(ice, liquid)
    wet_ice = widen(ice, side_db=-6.5, lag_s=0.0072) * attenuation_scalar(np.array([[.4], [-.4]]))
    cap = cap_clicks() + rubbing()
    soda = floating_cubes() + plops()
    soda_flows = np.arange(N) > SODA_START_S * SR
    soda += wet_wall(soda + attenuation_scalar(8.0) * liquid * soda_flows) + liquid
    near = tray + dry_glass + wet_ice + cap + soda
    near = filtered(near, 4, 115, "high")
    gas = jet()
    echoes = attenuation_scalar(-14) * room(near.mean(axis=0) + attenuation_scalar(3.0) * gas)
    return near + long_modes() + gas + echoes + air()


def roll_off(x):
    return signal.sosfilt(signal.butter(12, 16000, fs=SR, output="sos"), x)


def record(dry):
    top_cut = signal.cheby2(12, 60, 16900, fs=SR, output="sos")
    rounded = .86 * np.tanh(dry / 1.2)
    return roll_off(signal.sosfilt(top_cut, rounded))


dry = scene()
out = record(dry)
inscribe(out)
```